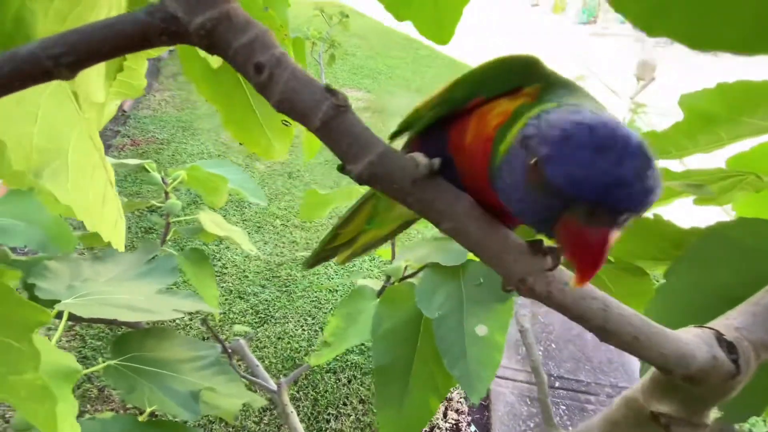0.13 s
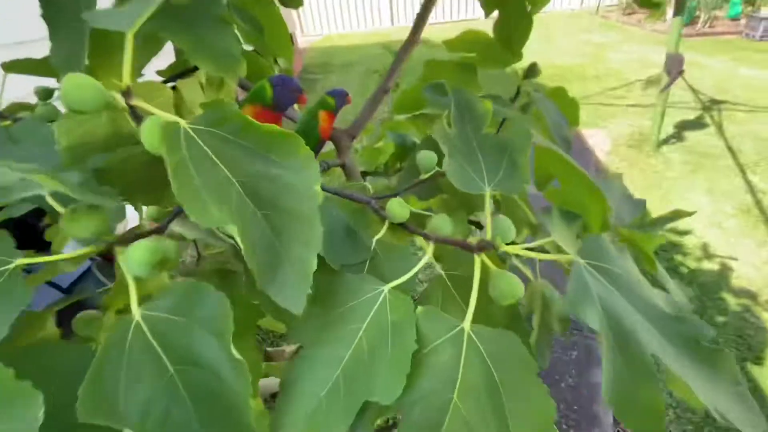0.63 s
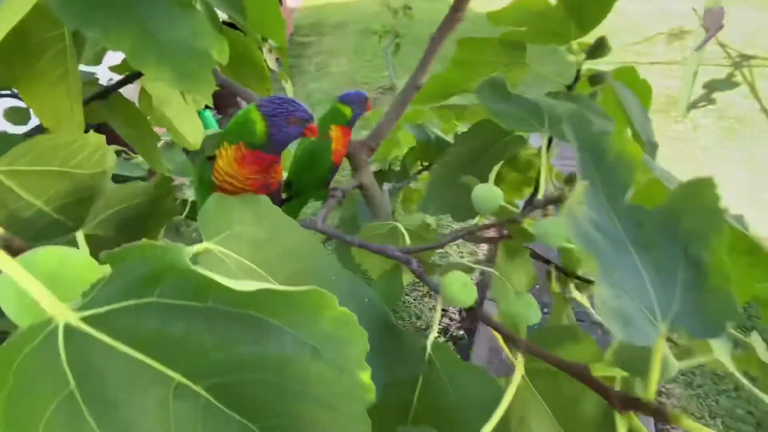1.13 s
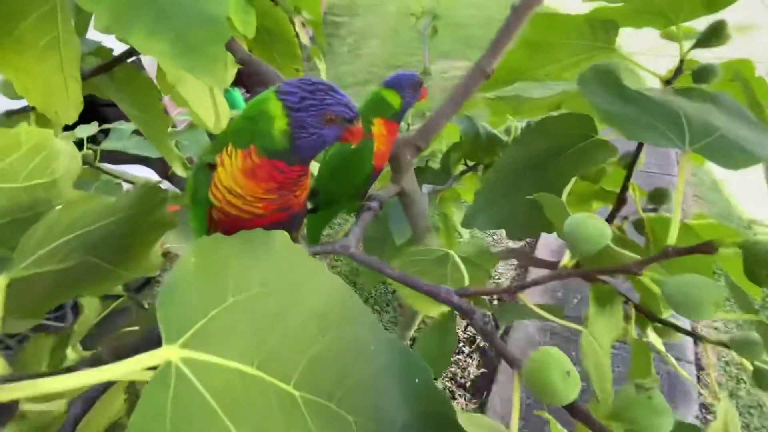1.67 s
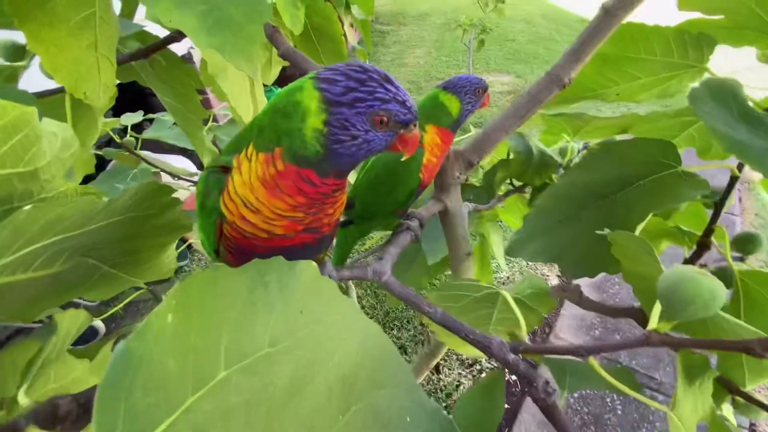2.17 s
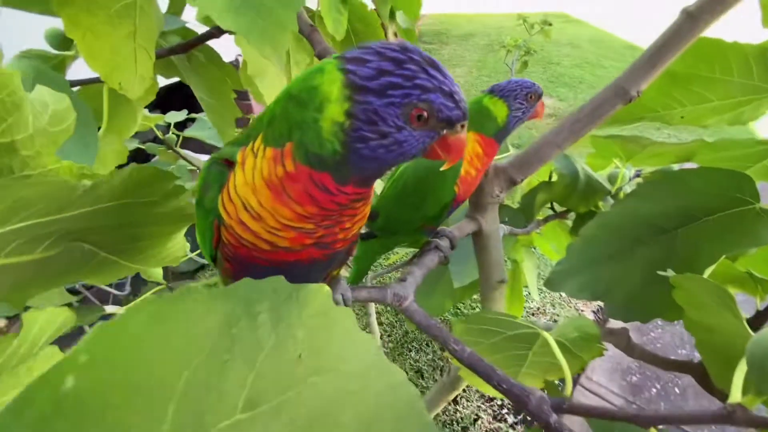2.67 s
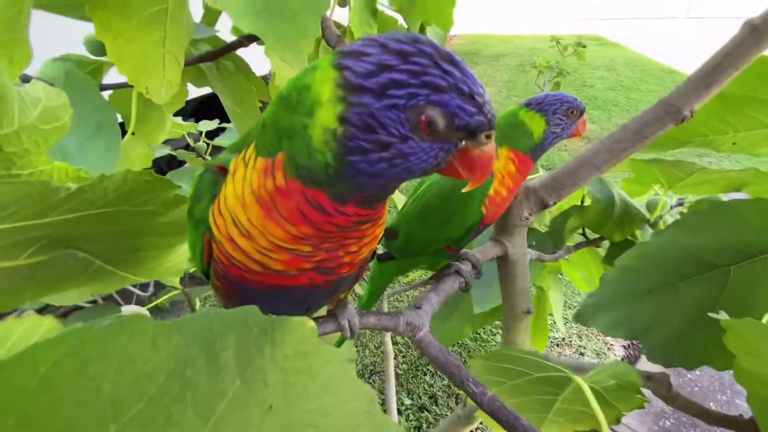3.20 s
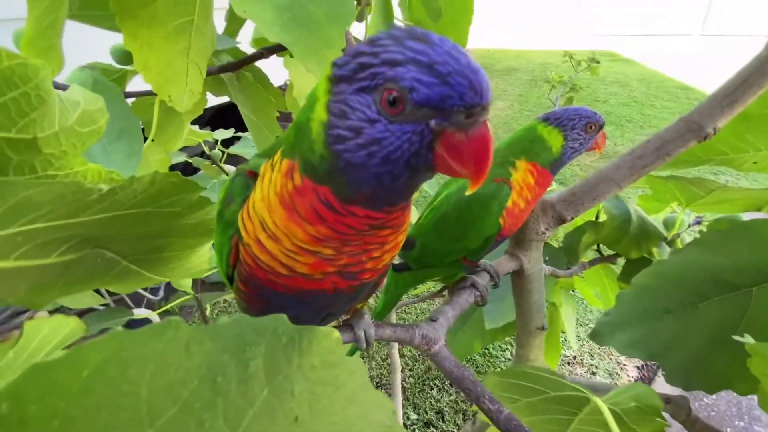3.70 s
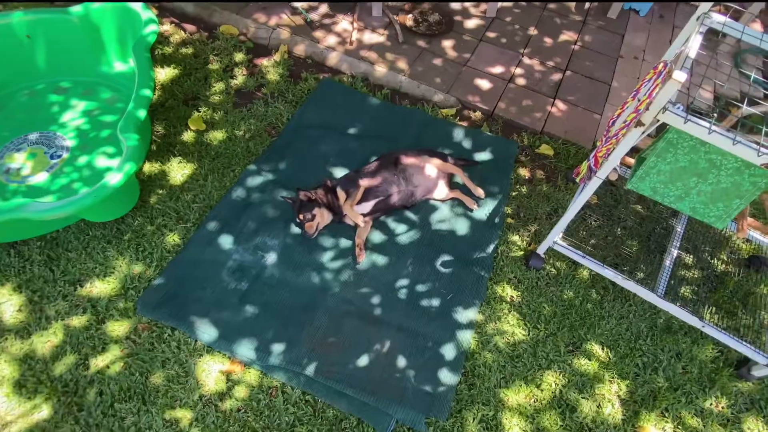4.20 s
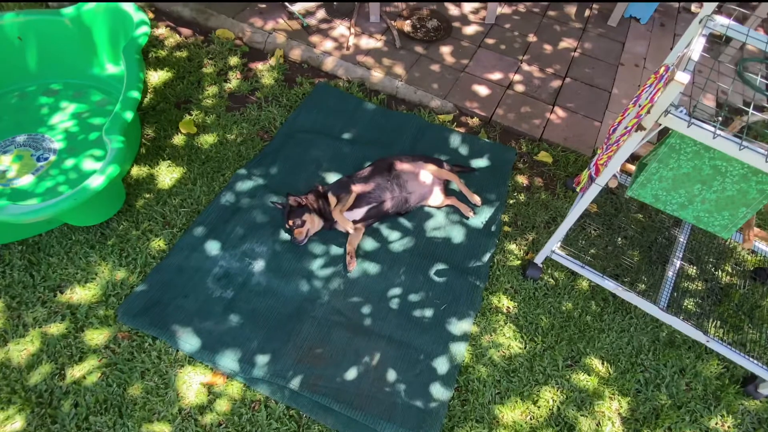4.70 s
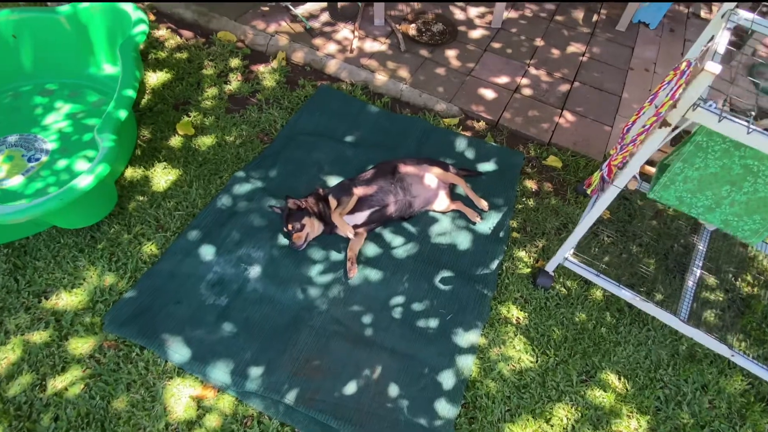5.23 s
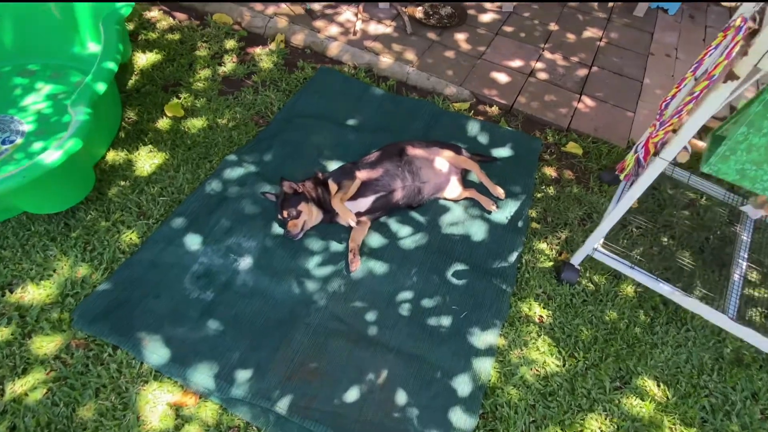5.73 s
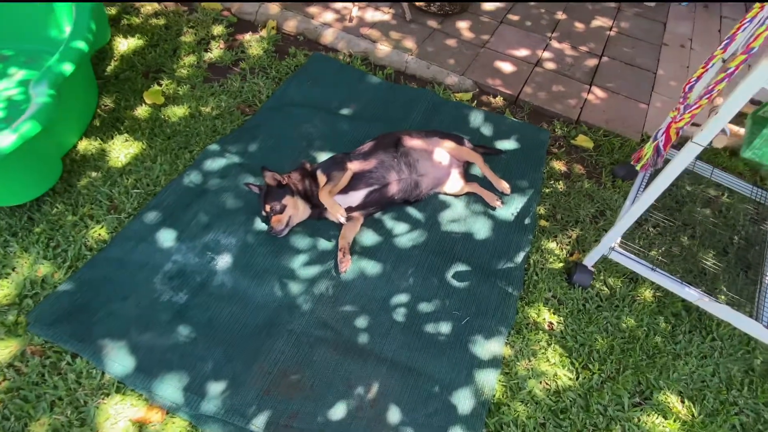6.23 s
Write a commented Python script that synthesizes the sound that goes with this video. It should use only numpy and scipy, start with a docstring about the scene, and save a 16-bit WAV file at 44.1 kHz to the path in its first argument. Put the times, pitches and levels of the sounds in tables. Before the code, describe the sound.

A quiet garden with faint low rumble, thin air and insect hiss, and very distant dove coos. Leaves brush close to the microphone and twigs tick. A lorikeet gives one clear rising and falling call, and later a soft breathy croak. Then, further off, a short rasp leads into a quick warbled whistle, followed by two harsh screeches ringing off house walls.

```python
"""A garden with a fig tree beside house walls, where lorikeets call: one arched clear call close by, a soft croak,
then from further off a warbled whistle and two harsh screeches that ring off the walls.
The birds are summed partials shaped by a throat, with breath noise; doves coo far away as near-sine tones.
Coloured noise makes the rustling leaves, a thin pulsing treble hiss, hissing insects, air and low rumble;
short cracks tick among them."""
import sys
import numpy as np
from scipy import signal
from scipy.fft import rfft, irfft, next_fast_len
from scipy.io import wavfile
from scipy.ndimage import uniform_filter1d

SR = 44100
rng = np.random.default_rng(int(sys.argv[2]) if len(sys.argv) > 2 else 0)


def wav_out(sig):
    """Save sig, one row per channel (or a flat mono array), as 16-bit PCM at SR to the path in sys.argv[1]."""
    wavfile.write(sys.argv[1], SR, np.round(np.clip(np.atleast_2d(sig).T, -1, 1) * 32767).astype(np.int16))


def invert_db(level):
    """Linear amplitude ratio for a level in decibels (20 dB per decade), elementwise."""
    return 10 ** (np.asarray(level, dtype=float) / 20)


N = 280917
T = np.arange(N) / SR

# Levels in the tables are relative: filters and placing still add their own gain.
# rumble, stepping to a new level at each row: start_s, level_db, drift_db_per_s
RUMBLE_STEPS = [(0, -59, -4.5), (0.429, -50.5, 0.87), (3.875, -51.5, -2)]
# spectrum of the rumble: freq_hz, gain_db
RUMBLE_SPECTRUM = [(15, -56.5), (25, -28), (43, 3), (65, 2.5), (129, -5.5), (198, -16), (236, -17),
                   (264, -21.5), (409, -28), (500, -24.5), (650, -61.5), (1100, -120)]
# spectrum of the air hiss: freq_hz, gain_db
AIR_SPECTRUM = [(180, -26), (300, -2.5), (462, -9), (592, 4.5), (884, -7), (1540, -15), (2000, -17.5),
                (4010, -9), (4470, -5.5), (5130, -4.5), (6990, -38.5), (9370, -28.5), (12000, -55.5),
                (15600, -85.5), (22000, -120)]
AIR_LEVEL_DB = -66.5
# bands of insect hiss: centre_hz, width_hz, level_db
INSECT_BANDS = [(2500, 250, -74), (3600, 150, -67.5), (4170, 300, -78.5), (5200, 120, -80)]

# dove coos: start_s, length_s, highest_pitch_hz, level_db
DOVE_COOS = [(.95, 0.56, 710.5, -61), (2.18, 0.38, 702, -66), (3.09, 0.21, 599, -69),
             (3.4, 0.49, 715, -66.5), (4.22, 0.15, 580, -67), (4.52, 0.23, 554, -64.5),
             (6.04, .36, 728.5, -63.5), (6.18, 0.13, 576, -66.5)]
# a far whistle, made like a coo but level in pitch: start_s, length_s, pitch_hz, level_db
DISTANT_WHISTLE = [(.25, .13, 2500, -69)]
COO_PEAKS_AT, COO_EDGE_DB = .45, -4.5  # share of the length; level drop half a length from the peak

# leaves brushed: loudest_s, rise_ms (per 20 dB), fall_ms (per 20 dB), level_db, treble_db (against the level)
LEAF_BRUSHES = [(0, 10, 203, -56.5, -3.5), (0.107, 34, 15, -52, -3), (0.114, 13, 297, -71, -10),
                (.428, 409, 4, -57.5, -1.5), (1.09, 99, 48, -84.5, 12), (1.256, 29.5, 52, -85, 15),
                (1.83, 9.5, 202, -69, -19), (1.93, 120, 243, -59, -22), (2.418, 200, 120, -59, -2),
                (2.532, 38, 116, -51.5, -11), (2.85, 500, 66, -60.5, -3), (2.998, 23, 70, -57, -8),
                (3.332, 203, 52, -59.5, -7), (3.64, 33, 502, -75.5, -8), (3.738, 197, 48.5, -69.5, -3.5),
                (3.868, 398, 2, -68.5, -16), (4.279, 200.5, 3000, -66, -25.5),
                (6.279, 102, 599, -71.5, 1.5)]
# spectrum of the leaf noise: freq_hz, gain_db
LEAF_SPECTRUM = [(180, -17), (300, -8.5), (440, -25), (644, -3.5), (697, 3), (1230, -3.5), (1850, 0.5),
                 (2310, -2.5), (3050, -2.5), (7000, -10.5), (9100, -114), (15400, -120)]
# a separate thin treble hiss pulses about five times a second; rise and fall are per 20 dB
PULSE_FIRST_S, PULSE_EVERY_S, PULSE_STOPS_S = 4.315, .191, 5.55
PULSE_RISE_MS, PULSE_FALL_MS, PULSE_DB = 15, 92, -60
# ticks and knocks of claws, beak and twigs: start_s, crack_db, ring_hz, t60_s, thud_db
TICK_HITS = [(0.105, -39.5, 2830, 0.023, -51), (0.394, -47.5, 3450, 0.075, -70),
             (0.493, -47, 1900, 0.019, -64), (1.473, -59, 2810, 0.0097, -79), (1.645, -57, 2200, .01, -80),
             (1.702, -56, 2400, .01, -80), (1.834, -46, 1800, 0.015, -64), (1.915, -39, 1730, 0.0069, -51),
             (2.526, -42.5, 4800, 0.02, -49), (2.536, -38, 4900, 0.016, -45), (2.545, -21, 734, 0.018, -34),
             (2.571, -28, 770, 0.027, -42), (2.584, -37.5, 1020, 0.044, -37.5),
             (2.701, -54, 5460, 0.018, -57), (2.84, -50, 5060, 0.027, -65),
             (2.996, -39.5, 3300, 0.0091, -65), (3.002, -48, 3740, 0.02, -74),
             (3.019, -51.5, 5370, 0.0098, -72), (3.169, -51.5, 3600, 0.016, -63),
             (3.787, -53.5, 3200, .012, -75), (3.825, -45, 880, 0.013, -55), (4.686, -41, 756, 0.025, -54)]

# early echoes off leaves, ground and wall, close by: delay_ms, left_gain, right_gain
NEAR_ECHOES = [(.11, -0.14, 0.31), (.45, 0.25, -0.13), (.9, 0.315, -0.0086), (1.6, 0.13, 0.048),
               (3.1, 0.24, 0.27)]
# the same for sounds further off: delay_ms, left_gain, right_gain
FAR_ECHOES = [(.2, 0.74, -0.51), (.77, 0.064, 0.35), (1.9, 0.29, -0.33), (3.3, 0.1, 0.58),
              (5.6, 0.66, 0.74), (8.7, 0.72, -1.06)]

# hoarse bursts, the fading tail of a screech, then a rasp as the whistle starts:
# loudest_s, rise_ms (per 20 dB), fall_ms (per 20 dB), level_db
HOARSE_BURSTS = [(3.878, 2.5, 130, -39), (3.951, 11, 46.5, -33.5)]
# croak, with partials at multiples of half this pitch: time_s, pitch_hz, level_db
CROAK_CURVE = [(3.234, 624, -60), (3.25, 693, -44.5), (3.266, 766, -44.5), (3.29, 705, -39),
               (3.32, 685, -36.5), (3.338, 739, -35.5), (3.348, 805, -55)]
# throat of the croak: freq_hz, gain_db
CROAK_THROAT_SHAPE = [(300, -23.5), (700, 7.5), (1050, -1.5), (1400, 12.5), (1750, -8), (2100, -21.5),
                      (3000, -17.5), (4200, -23), (5400, -24), (9000, -58)]
# whistle in three notes, the last warbled, each with rows: time_s, pitch_hz, level_db
WHISTLE_NOTES = [
    [(3.924, 1500, -66), (3.934, 1596, -29), (3.945, 1506, -35), (3.954, 1220, -40)],
    [(3.942, 2497, -52), (3.958, 2526, -20), (3.98, 2498, -21), (4.005, 2410, -17.5), (4.018, 2353, -28.5)],
    [(4.008, 2600, -42.5), (4.038, 2840, -17), (4.052, 3105, -30.5), (4.065, 2851, -17), (4.082, 2638, -23),
     (4.11, 2977, -16.5), (4.125, 2827, -28), (4.142, 2619, -21.5), (4.16, 2600, -50)],
]
# throat of the first, squeaked note: freq_hz, gain_db
SQUEAK_THROAT_SHAPE = [(1000, 8), (1700, 2), (2600, -4.5), (6500, -8), (10000, -38)]
# throat of the other two notes: freq_hz, gain_db
WHISTLE_THROAT_SHAPE = [(2200, 9), (5000, 4), (6000, 4.5), (7500, -13.5), (9000, -7.5), (11000, -13.5),
                        (13000, -31), (15500, -29)]

# screeches: start_s, length_s, level_db, half_pitch_db (at the start), high_side_db (at the start)
SCREECH_EVENTS = [(4.925, .395, -30, -5.5, -2), (5.572, 0.36, -29.5, 4.5, -6.5)]
# throat of the screeches: freq_hz, gain_db
SCREECH_THROAT_SHAPE = [(350, -56), (600, -26), (1000, -9.5), (1550, -9.5), (2100, -2), (2430, -3.5),
                        (2710, -10.5), (3460, -8), (4010, -5.5), (5540, -9), (7960, -19), (10000, -12.5),
                        (12100, -27), (13800, -18.5), (15000, -39)]
# windpipe resonances that a screech rings: centre_hz, width_hz, first_screech_db, second_screech_db
WINDPIPE = [(1114, 165, 0.5, -2), (2113, 180, -0.5, -3), (2670, 78, -1, 7), (3902, 81, 3.5, -6),
            (4230, 92, 0, -0.5), (5290, 130, -2, 4), (5840, 340, -4, -6)]
LOW_SIDE_HZ, HIGH_SIDE_HZ = 1968, 2778  # the low side passes this pitch halfway through
SCREECH_ROUGH, PITCH_RISE_PER_S = .17, .12  # both as shares
SCREECH_ATTACK_S, SCREECH_RELEASE_S, SCREECH_EDGE_DB, SCREECH_SWELL_DB_PER_S = 0.025, 0.037, -20, 5
HALF_SAG_DB_PER_S, HIGH_SAG_DB_PER_S = 38, 13
BEAK_SHUT_DB, BEAK_OPENS_S, BEAK_WIDENS_DB_PER_S = -18, 0.019, 6.5

# arched call: time_s, pitch_hz, level_db
ARCH_CURVE = [(.584, 896, -55), (.594, 904, -35), (.604, 910, -31.5), (.612, 1023, -25), (.65, 1103, -21),
              (.7, 1163, -18.5), (.745, 1220, -17), (.79, 1200, -18.5), (.82, 1158, -19), (.886, 1069, -24),
              (.9, 987, -32.5), (.912, 927, -53)]
# throat of the arched call: freq_hz, gain_db
ARCH_THROAT_SHAPE = [(800, 1), (1200, -11.5), (2000, 8), (2400, -7.5), (3400, 1), (4200, -9), (4900, -8.5),
                     (5700, 2), (7000, -7.5), (8300, -12), (9500, -11.5), (11200, -13.5), (12000, -36),
                     (14500, -60)]
STEADY_WITHIN_DB, ROUGHEST = 5, .3  # a voice gets no rougher this close to its loudest; upper limit


def colour(x, points):
    """Filter by (Hz, dB) points, to rms 1."""
    hz, db = np.transpose(points)
    size = next_fast_len(len(x))
    bins_hz = np.arange(size // 2 + 1) * SR / size
    gain = invert_db(np.interp(np.log(bins_hz + 1), np.log(hz), db, -90, -90))
    y = irfft(rfft(x, size) * gain, size)[:len(x)]
    return y / np.sqrt(np.mean(y ** 2))


def ring(x, hz, width):
    """One resonance, gain 1 at its centre."""
    return signal.lfilter(*signal.iirpeak(hz, hz / width, SR), x)


def walk(rate, size=N):
    """Random levels held 1 / rate s and slewed twice; spread near 1."""
    k = max(int(SR / rate), 1)
    held = np.repeat(rng.standard_normal(size // k + 1), k)
    return 1.8 * uniform_filter1d(uniform_filter1d(held, k), k)[:size]


def read(rows):
    """Samples that a curve spans and its columns, sample by sample."""
    s, *columns = np.transpose(rows)
    at = slice(int(s[0] * SR), min(int(s[-1] * SR), N))
    return (at, *(np.interp(T[at], s, c) for c in columns))


def span(start, length):
    """Samples of an event and the time since its start."""
    at = slice(int(start * SR), min(int((start + length) * SR), N))
    return at, T[at] - start


def fade(x, ms):
    """Raised-cosine fade at both ends."""
    return x * signal.windows.tukey(len(x), min(2 * ms * SR / 1000 / len(x), 1))


def bump(s, rise_ms, fall_ms, db):
    """Gain that climbs 20 dB in rise ms to its peak and drops 20 dB every fall ms."""
    steps = 1000 * np.where(T < s, (s - T) / rise_ms, (T - s) / fall_ms)
    return invert_db(db - 20 * steps.clip(0, 8))


def place(x, db, pan_db, lag, echoes, near, far_db, t60):
    """Direct sound, early echoes that differ left and right, and the garden's tail, whose treble dies first."""
    t = T[:SR]
    far = rng.standard_normal((2, SR)) * invert_db(-60 * t / t60) * np.minimum(t / 0.0039, 1)
    dull = signal.lfilter([.65], [1, -.35], far)
    far = dull + (far - dull) * invert_db(-60 * t / 0.16)
    response = invert_db(far_db) * far / np.linalg.norm(far[0])
    for ms, left, right in echoes:
        response[:, 20 + int(ms * SR / 1000)] += near * left, near * right
    # direct sound; lag is how many samples the left side trails the right
    response[0, 20 + int(lag)] += 1
    response[1, 20] += 1
    placed = signal.fftconvolve(x[None], response, axes=1)[:, 20:N + 20]
    return placed * invert_db(db + np.array([[pan_db], [-pan_db]]) / 2)


def rumble():
    """Distant low noise, partly shared by left and right, drifting and wavering in level."""
    row = np.searchsorted(np.transpose(RUMBLE_STEPS)[0], T, "right").clip(1) - 1
    start, db, drift_db = np.transpose(RUMBLE_STEPS)[:, row]
    mid, side = (colour(rng.standard_normal(N), RUMBLE_SPECTRUM) for _ in range(2))
    # the right side turns the phase of the deepest bass
    turned = signal.lfilter([.993, -1], [1, -.993], mid)
    stereo = np.array([.85 * mid, turned]) + .5 * side * np.array([[.6], [-1]])
    return invert_db(db + drift_db * (T - start) + 1.4 * walk(4)) * stereo


def air():
    """Thin steady hiss, unrelated left and right."""
    return np.array([invert_db(AIR_LEVEL_DB) * colour(rng.standard_normal(N), AIR_SPECTRUM) for _ in range(2)])


def insects():
    """Resonant bands of noise, unrelated left and right, each wavering in level."""
    out = np.zeros((2, N))
    for hz, width, db in INSECT_BANDS:
        out += invert_db(db + 11 + 0.83 * walk(19)) * ring(rng.standard_normal((2, N)), hz, width)
    return out


def coos(rows, throb_db, bow):
    """Near-sine coos, highest and loudest near the middle; the throat flutters about fifty times a second."""
    out = np.zeros(N)
    for start, length, top_hz, level_db in rows:
        at, t = span(start, length)
        size = len(t)
        off = (2 * (t / length - COO_PEAKS_AT)) ** 2
        hz = top_hz * (1 - bow * length * off)
        db = level_db + COO_EDGE_DB * off ** 2
        flutter = np.sin(2 * np.pi * np.cumsum(52 * (1 + 0.055 * walk(5.9, size))) / SR)
        gain = np.sqrt(2) * invert_db(db + throb_db * flutter + 2.5 * walk(30.1, size))
        tone = np.sin(2 * np.pi * np.cumsum(hz * (1 + .04 * walk(250, size))) / SR)
        out[at] += fade(gain * tone, ms=18)
    return out


def doves():
    """Doves and one far whistle, blurred by a strong, short tail."""
    voices = coos(DOVE_COOS, throb_db=4.5, bow=0.28) + coos(DISTANT_WHISTLE, throb_db=6.5, bow=0)
    return place(voices, db=-0.5, pan_db=0.0, lag=18.5, echoes=FAR_ECHOES, near=0.77, far_db=2.0, t60=0.15)


def hiss_pulses():
    """Gain of the separate thin treble hiss, pulsing about five times a second."""
    starts = np.arange(PULSE_FIRST_S, PULSE_STOPS_S, PULSE_EVERY_S)
    return sum(bump(s, PULSE_RISE_MS, PULSE_FALL_MS, PULSE_DB) for s in starts)


def leaves_and_pulsing_hiss():
    """Crackly leaf noise, different left and right, with a sharper treble hiss; the pulsing hiss shares its colour."""
    gains = [bump(*row[:4]) for row in LEAF_BRUSHES]
    treble = sum(g * invert_db(row[4] - 4.5) for g, row in zip(gains, LEAF_BRUSHES))
    treble = treble + hiss_pulses()
    # bands that wander in level independently, as scrapes favour one or another
    bands_hz = (1200, 1830, 2600, 3750, 4970)
    scrapes = [invert_db(3.63 * walk(14.04)) for _ in bands_hz]
    out = []
    for _ in range(2):
        grains = rng.standard_normal(N) * invert_db(2.03 * walk(300) + 2.4 * walk(40))
        top = colour(grains, [(6000, -63), (7500, 12.5), (11300, 3.5), (12000, -24), (14500, -14.5)])
        body = colour(grains, LEAF_SPECTRUM)
        body = 0.087 * body + sum(g * ring(body, hz, 0.35 * hz) for g, hz in zip(scrapes, bands_hz))
        out.append(sum(gains) * body + treble * top)
    return np.array(out)


def ticks():
    """Each a dry noise crack, strongest near its own pitch, over a low thud shared by left and right."""
    out, t = np.zeros((2, N + 3000)), T[:3000]
    for s, db, hz, t60, thud_db in TICK_HITS:
        burst = rng.standard_normal((2, 3000)) * invert_db(-60 * t / t60) * np.minimum(t / 0.00055, 1)
        crack = 6.3 * ring(burst, hz, 0.32 * hz) + 0.13 * ring(burst, 1800, 4600)
        # the power of t makes the thud sink in pitch
        thud = np.sin(2 * np.pi * 205 * t ** .9) * invert_db(thud_db - 60 * t / 0.039)
        first = int(s * SR)
        out[:, first:first + 3000] += crack * invert_db(db) + thud
    return signal.sosfilt(signal.butter(4, 10500, fs=SR, output="sos"), out[:, :N])


def hoarse_bursts():
    """A screech's fading tail, then a rasp as the whistle starts: throat-coloured noise, unrelated left and right."""
    out = np.zeros((2, N))
    at, t = span(HOARSE_BURSTS[0][0] - .05, 0.52)
    gain = sum(bump(*row) for row in HOARSE_BURSTS)[at]
    for side in out:
        noise = ring(rng.standard_normal(len(t)), 4600, 3000)
        side[at] = gain * colour(noise, SCREECH_THROAT_SHAPE)
    return out


def syrinx(hz, rough, throat, breath, divide=1, half_db=0.):
    """Membrane partials weighted by the throat; roughness shakes period and partials and lets breath through.

    The breath opens once a cycle; divide=2 adds partials between those of the given pitch, at half_db."""
    size = len(hz)
    shake = rough * (0.12 * walk(500, size) + .06 * walk(40, size))
    phase = 2 * np.pi * np.cumsum(hz * (1 + shake)) / SR / divide
    f, db = np.transpose(throat)
    tone = np.zeros(size)
    for k in range(1, int(16000 * divide / hz.min())):
        throat_db = np.interp(np.log(k * hz / divide), np.log(f), db, -90, -90)
        flicker_db = 10 * rough * walk(70, size)
        tone += invert_db(throat_db + half_db * (k % divide > 0) + flicker_db) * np.sin(k * phase + k * k)
    # even out the tone's level; the callers shape it
    tone = tone / np.sqrt(uniform_filter1d(tone ** 2, 900) + 1e-12)
    # differencing twice brightens the breath
    puffs = np.diff(colour(rng.standard_normal(size + 2), throat), 2) * (1 + np.cos(phase))
    return (tone + breath * rough * puffs) * invert_db(4.9 * rough * walk(250, size))


def call(rows, throat, breath, rough, rough_per_db, divide=1):
    """A voiced note; the weaker the push, the rougher it sounds."""
    out = np.zeros(N)
    at, hz, db = read(rows)
    weakness_db = np.maximum(db.max() - db - STEADY_WITHIN_DB, 0)
    rough = np.clip(rough + rough_per_db * weakness_db, 0, ROUGHEST)
    out[at] = fade(invert_db(db) * syrinx(uniform_filter1d(hz, 250), rough, throat, breath, divide), ms=1)
    return out


def croak():
    """Soft breathy croak: a rough voice with partials at half its pitch, nearly without a tail."""
    voice = call(CROAK_CURVE, CROAK_THROAT_SHAPE, breath=7.5, rough=0.18, rough_per_db=0.6, divide=2)
    return place(voice, db=7.0, pan_db=-3.0, lag=-17, echoes=NEAR_ECHOES, near=0.87, far_db=-46, t60=0.34)


def whistle():
    """A squeak and two clear notes, the last swooping up and down, in a strong tail."""
    voice = call(WHISTLE_NOTES[0], SQUEAK_THROAT_SHAPE, breath=0.98, rough=.02, rough_per_db=.02)
    for note in WHISTLE_NOTES[1:]:
        voice = voice + call(note, WHISTLE_THROAT_SHAPE, breath=0.205, rough=.055, rough_per_db=.002)
    return place(voice, db=-3.5, pan_db=4.0, lag=14, echoes=FAR_ECHOES, near=1.0, far_db=-5.5, t60=0.44)


def screeches():
    """Both sides of the syrinx at once, the low one starting with strong half-pitch partials that fade.

    Each side shakes the other and the windpipe rings."""
    out = np.zeros(N)
    flat = [(500, 0), (15500, 0)]
    for k, (start, length, level_db, half_db, high_db) in enumerate(SCREECH_EVENTS):
        at, t = span(start, length)
        edge = np.maximum(np.maximum(1 - t / SCREECH_ATTACK_S, 1 - (length - t) / SCREECH_RELEASE_S), 0)
        db = level_db + SCREECH_SWELL_DB_PER_S * t + SCREECH_EDGE_DB * edge
        low_hz = LOW_SIDE_HZ * (1 + PITCH_RISE_PER_S * (t - length / 2))
        half_now_db = half_db - HALF_SAG_DB_PER_S * t
        low = syrinx(low_hz, SCREECH_ROUGH, flat, breath=1.0, divide=2, half_db=half_now_db)
        high = syrinx(HIGH_SIDE_HZ + 0 * t, .6 * SCREECH_ROUGH, flat, breath=0.88)
        # the product is each side shaking the other
        both = low + invert_db(high_db - HIGH_SAG_DB_PER_S * t) * high + 1.41 * low * high
        voice = colour(both, SCREECH_THROAT_SHAPE)
        voice = 0.66 * voice + sum(invert_db(row[2 + k] - 3) * ring(voice, *row[:2]) for row in WINDPIPE)
        # an opening beak lifts the rasp
        rasp_db = BEAK_SHUT_DB * np.exp(-t / BEAK_OPENS_S) + BEAK_WIDENS_DB_PER_S * t
        voice = voice + (invert_db(rasp_db + 3.5) - 1) * ring(voice, 6500, 5700)
        out[at] = fade(invert_db(db) * voice, ms=4.7)
    return place(out, db=-4.0, pan_db=2.0, lag=0, echoes=FAR_ECHOES, near=0.81, far_db=-5.0, t60=0.43)


def arched_call():
    """Clear close call whose pitch climbs and falls; its weak ends are rough."""
    voice = call(ARCH_CURVE, ARCH_THROAT_SHAPE, breath=1.5, rough=.04, rough_per_db=0.05)
    return place(voice, db=-1.5, pan_db=0.0, lag=-1.5, echoes=NEAR_ECHOES, near=0.9, far_db=-21.5, t60=.5)


def scene():
    """The garden's bed, then the lorikeets over it."""
    bed = rumble() + air() + insects() + doves() + leaves_and_pulsing_hiss() + ticks()
    lorikeets = hoarse_bursts() + croak() + whistle() + screeches() + arched_call()
    return bed + lorikeets


def top_cut(x):
    """Nothing passes above the cut-off."""
    return signal.sosfilt(signal.butter(12, 15700, fs=SR, output="sos"), x)


def record(dry):
    """The microphone drops the deepest bass, below 36 Hz."""
    mix = signal.sosfilt(signal.butter(2, 36, "high", fs=SR, output="sos"), dry)
    return top_cut(mix)


dry = scene()
out = record(dry)
wav_out(out)
```